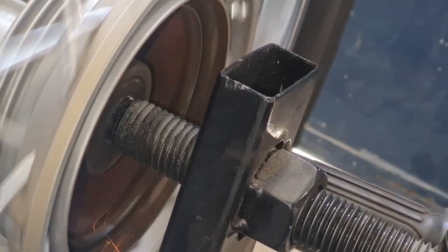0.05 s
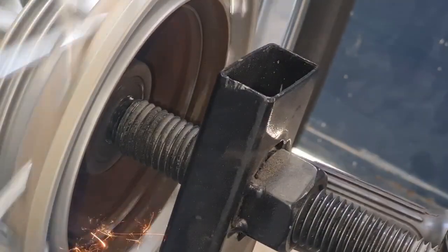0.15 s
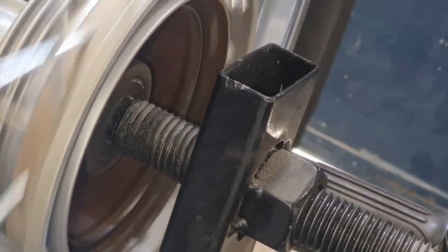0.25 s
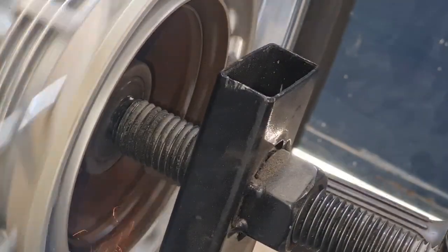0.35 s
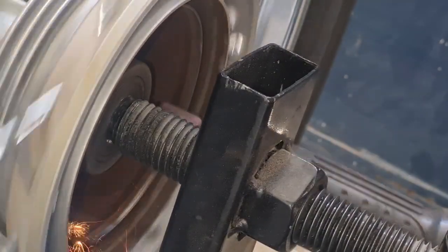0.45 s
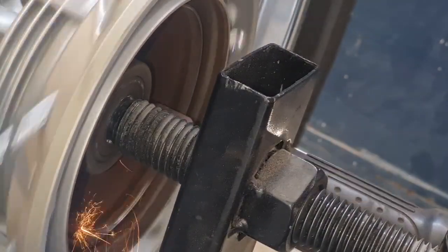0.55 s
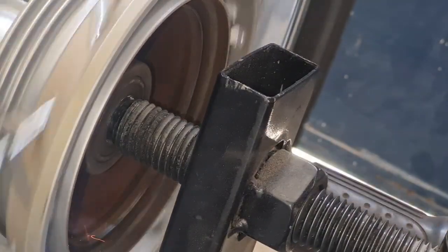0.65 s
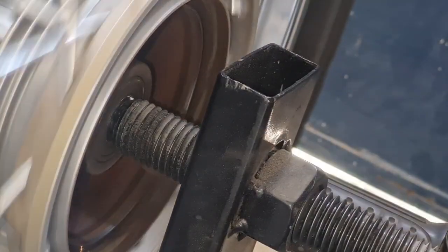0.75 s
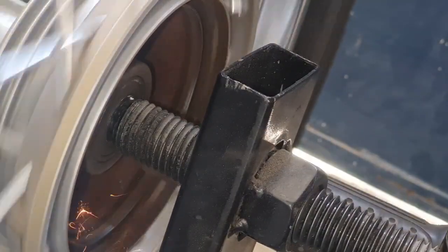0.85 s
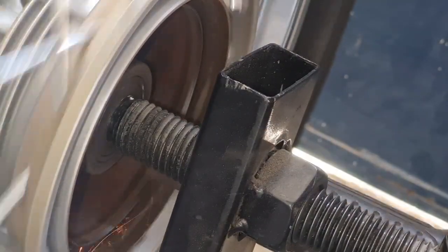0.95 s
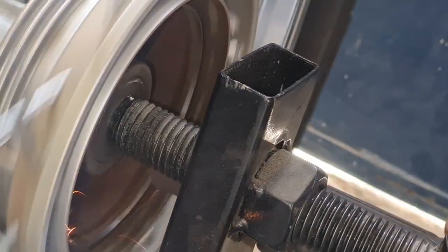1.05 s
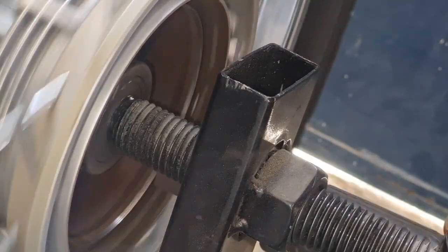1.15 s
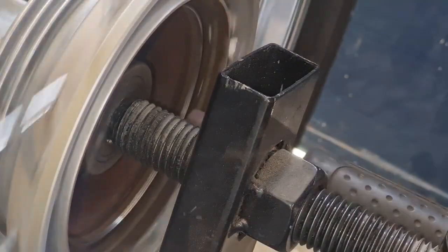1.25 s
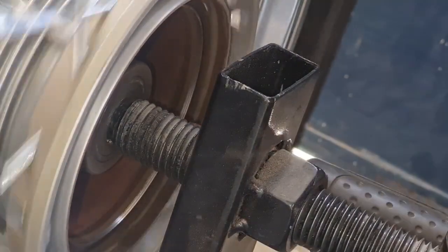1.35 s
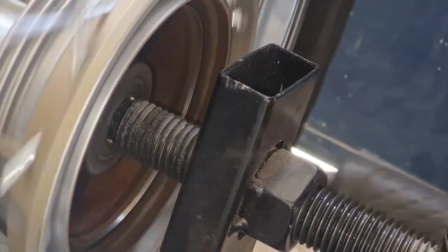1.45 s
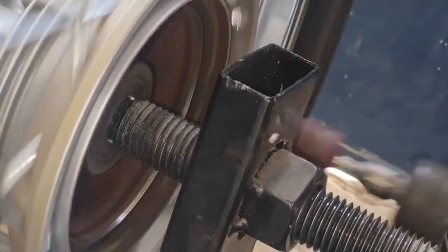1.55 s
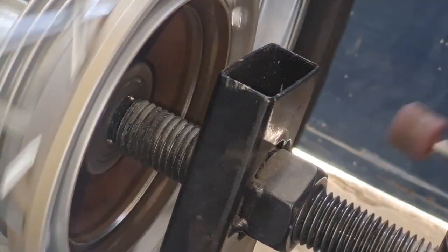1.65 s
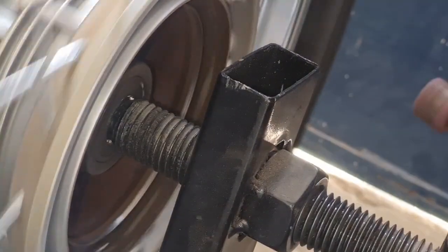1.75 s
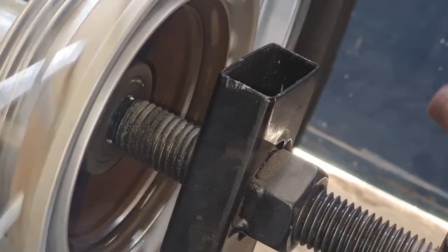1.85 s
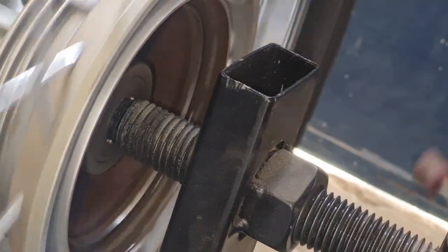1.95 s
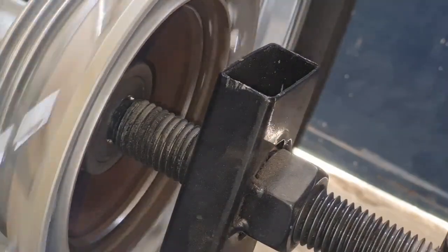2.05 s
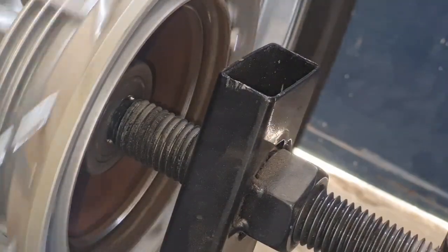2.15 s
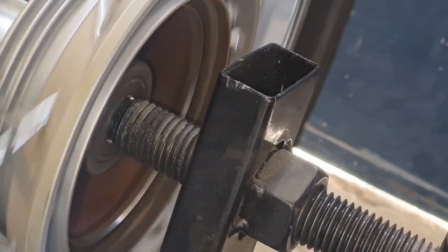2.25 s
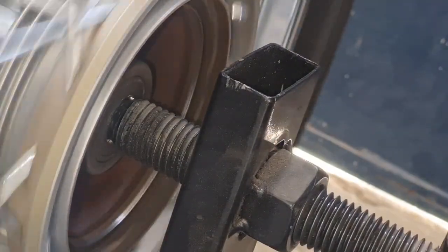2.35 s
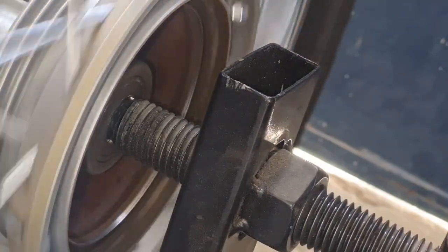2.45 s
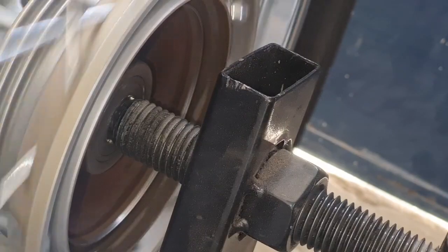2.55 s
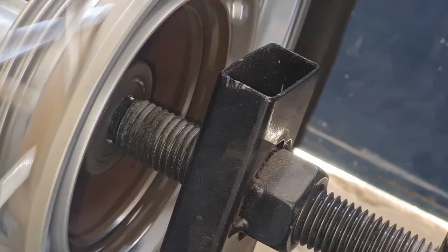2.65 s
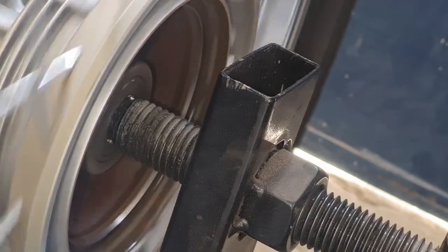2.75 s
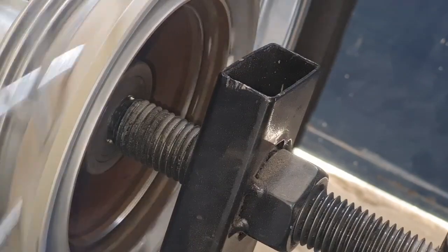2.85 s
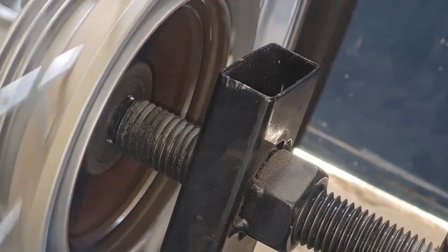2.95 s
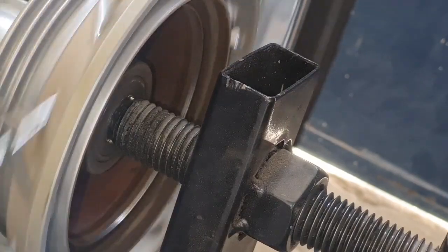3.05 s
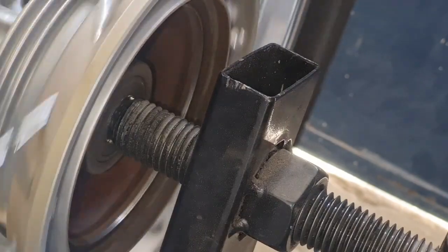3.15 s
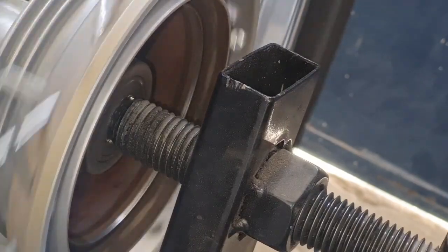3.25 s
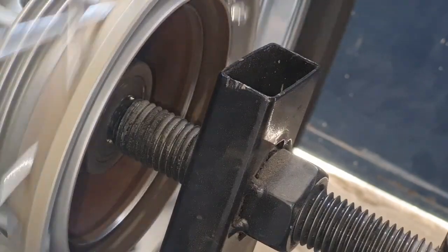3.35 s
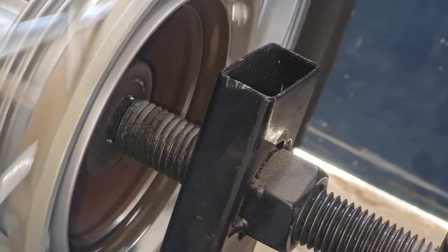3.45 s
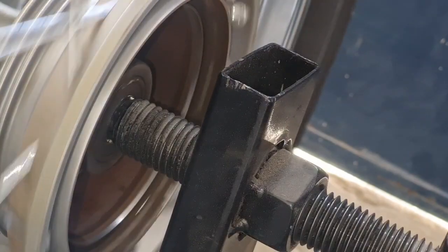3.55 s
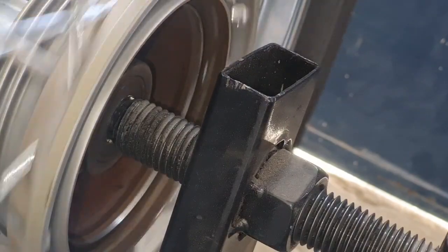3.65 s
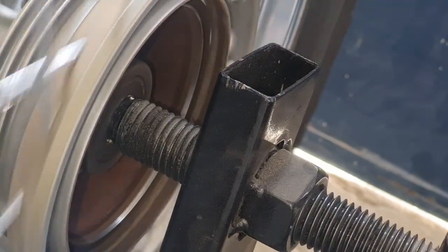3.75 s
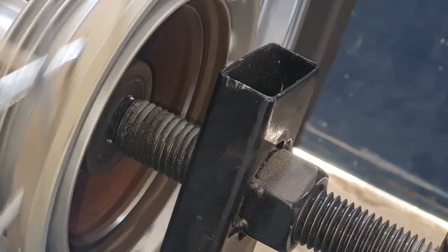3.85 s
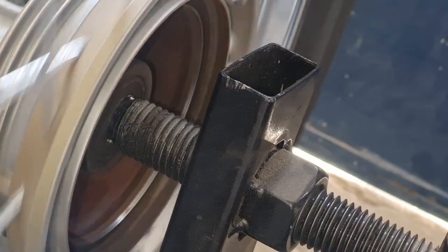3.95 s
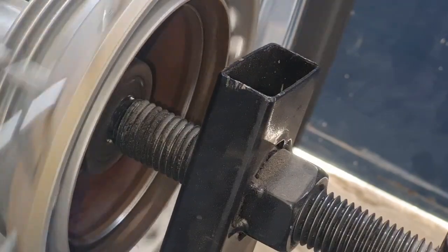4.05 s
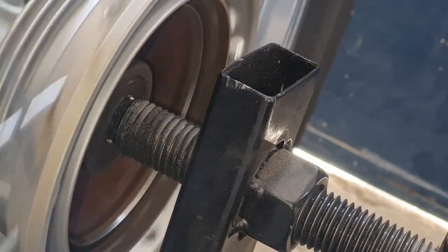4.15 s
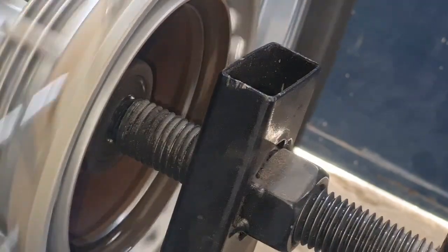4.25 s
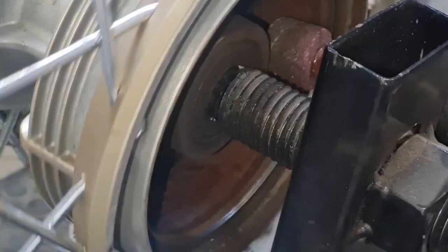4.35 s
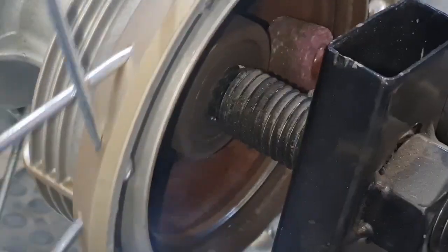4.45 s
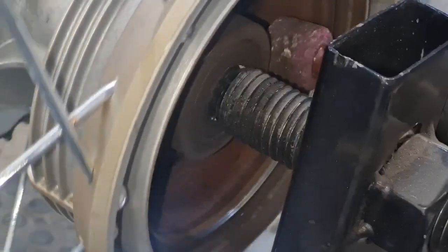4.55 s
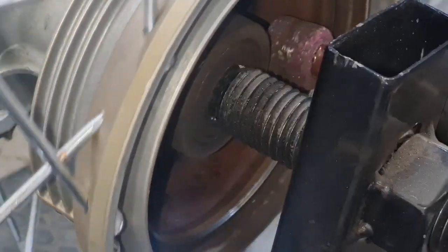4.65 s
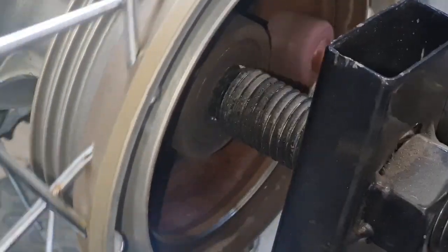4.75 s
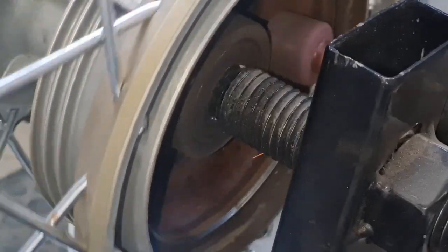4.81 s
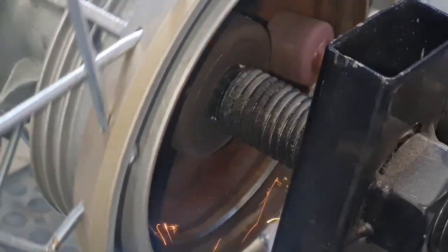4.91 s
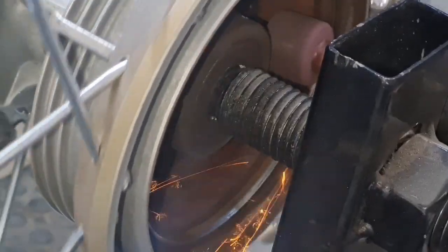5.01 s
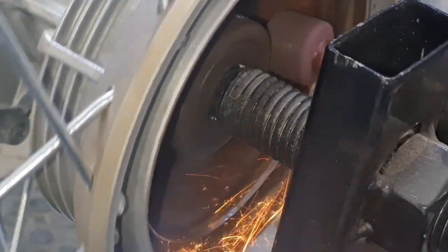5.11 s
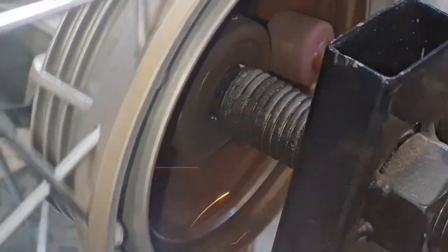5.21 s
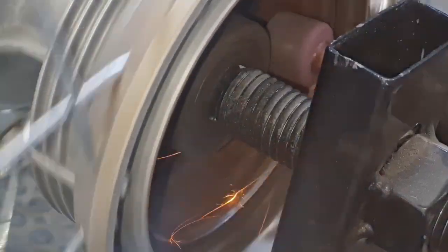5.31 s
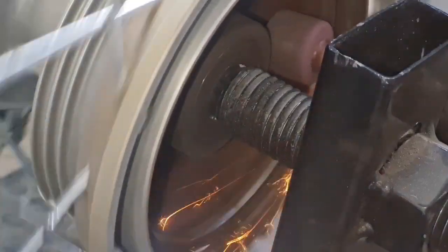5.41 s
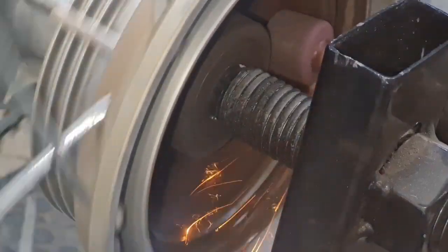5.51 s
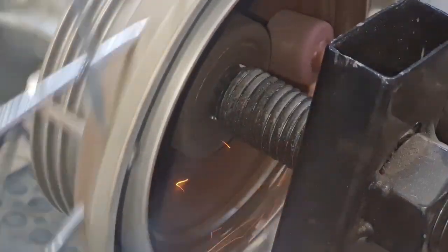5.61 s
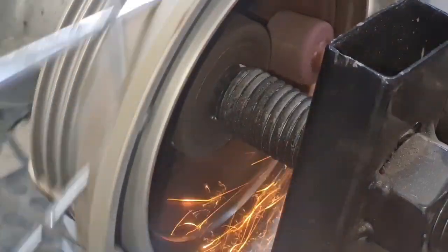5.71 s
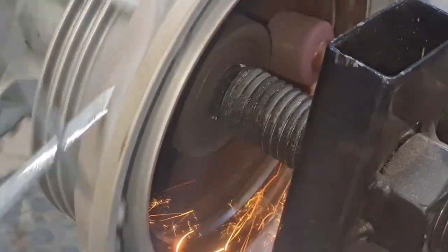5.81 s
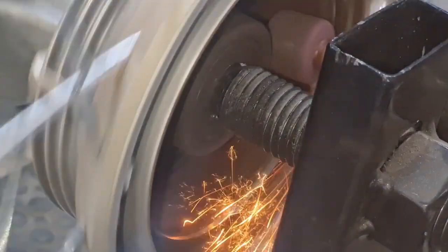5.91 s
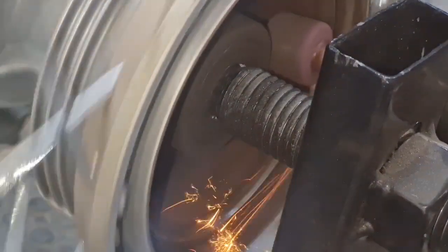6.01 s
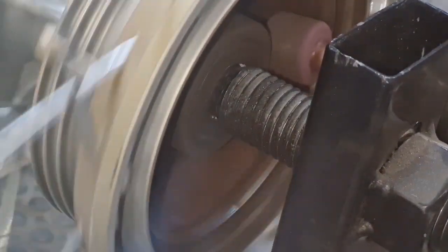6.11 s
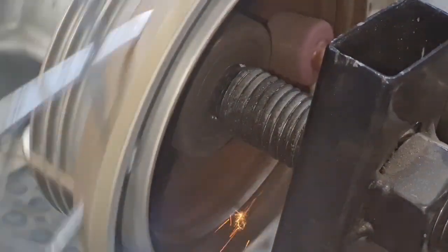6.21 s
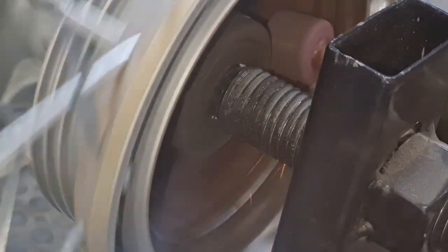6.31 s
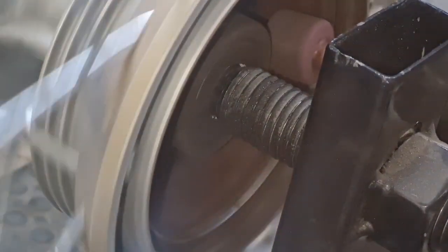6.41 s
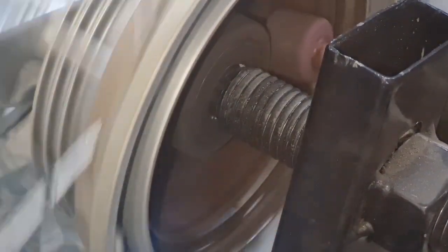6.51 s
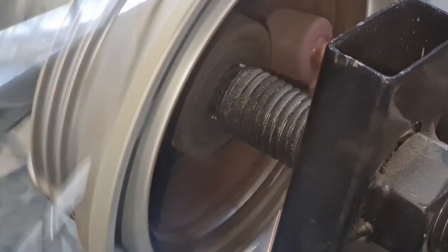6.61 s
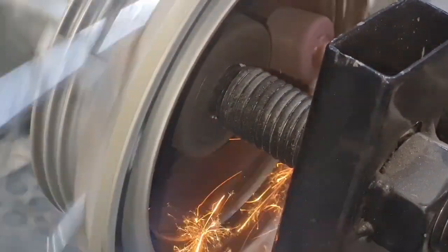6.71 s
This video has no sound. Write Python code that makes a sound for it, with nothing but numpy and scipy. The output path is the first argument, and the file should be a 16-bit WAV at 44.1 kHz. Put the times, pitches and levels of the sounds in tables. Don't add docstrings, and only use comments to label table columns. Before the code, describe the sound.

From the start a hand-held electric grinder rasps loudly inside a hollow metal drum: dense gritty hiss, a fast buzzing knock from the uneven stone and a piercing ring in the upper mids, the motor pitch climbing over the first second. Around 1.2 s the stone skips with a knock, and by 1.4 s it is off the metal. The motor then coasts, its thin whistles sliding steadily downward amid wide airy fan rush and wheel roar, with a small clack near 2.4 s. At 4.4 s this cuts to quiet, low workshop murmur with barely audible pings. At 4.8 s the stone lands with several hard knocks and grinds again, darker and heavier; the motor surges up to 5.8 s, bogs into a growl around 6.5 s, and recovers with a fresh loud bite at the end. Close stereo microphones, short metallic reflections, right side louder.

```python
import sys
import numpy as np
from scipy import signal
from scipy.fft import rfft, irfft, next_fast_len
from scipy.io import wavfile
from scipy.ndimage import uniform_filter1d

SR = 44100
rng = np.random.default_rng(int(sys.argv[2]) if len(sys.argv) > 2 else 0)


def master_out(mix):
    frames = np.transpose(np.atleast_2d(mix))
    ceiling = np.clip(frames, -1, 1)
    pcm = np.round(ceiling * 32767).astype(np.int16)
    wavfile.write(sys.argv[1], SR, pcm)


def gain_from_db(level_db):
    decades = np.asarray(level_db, float) / 20
    return 10 ** decades


N = 298557
T = np.arange(N) / SR
CUT_OUT, CUT_IN, FADE = 4.417, 4.788, .008
EDGE_HZ = 16050
RING_HZ, RING_WIDTH = 1646, 145

# t/s, grit level/dB, share of the stone's sharp edge in the cut (0-1)
CONTACT = [
    [(0.0, -24, 0.47), (0.28, -24.5, 0.5), (0.4, -22, 0.73), (0.6, -29.5, 0.6), (0.74, -28, 0.6),
     (0.82, -26, 0.75), (1.1, -27, .3), (1.2, -31.5, .6), (1.33, -40, 0)],
    [(4.795, -23, 0.3), (4.97, -21.5, 0.6), (5.03, -27, 1), (5.3, -26.5, 0.63), (5.8, -28.5, 0.79),
     (6.1, -27.5, 0.83), (6.5, -31.5, 0.26), (6.66, -30, 0.5), (6.75, -21.5, .5)],
]
# t/s, half length/s, grit level/dB, ring level/dB
BITES = [(0.13, .02, -4, -20), (0.3, 0.16, -1.5, -1), (0.555, .03, -1, 11), (0.76, .015, -1.5, 5),
         (0.81, .012, 2, -5), (1.08, .12, 3, 5.5), (1.15, .012, -4, -13), (1.19, .04, 2.5, 1.5),
         (4.87, .015, -3.5, -43), (4.99, .02, 2, -2), (5.18, .02, 3.5, 1), (5.305, .025, 2.5, 5.5),
         (5.378, .02, -3, 1), (5.44, .025, 3, 10), (5.565, .02, -1.5, 9), (5.835, .035, 1, 7.5),
         (5.918, .018, -5, 3), (5.96, .02, 0, 10.5), (6.003, .012, -5.5, 6), (6.08, 0.081, -3, 2),
         (6.155, .03, -8.5, 5), (6.2, .012, -0.5, 6), (6.32, .02, 2, -8.5), (6.415, .035, 2, 6.5),
         (6.525, .025, -0.5, 11), (6.572, .025, -5, 4), (6.63, .04, 1, -5), (6.69, .015, -7.5, -1),
         (6.755, .03, -1, 6.5)]
# t/s, nearness/dB
NEARNESS = [(1.35, 2), (1.5, 0), (2.2, -4), (2.35, 1), (2.7, 3.5), (3.3, 4), (4.41, 1.5)]
# t/s, peak level/dB, f/Hz, decay time/s
KNOCKS = [(1.163, -10, 1680, .04), (2.413, -36, 256, .04), (2.4297, -16, 1200, .012),
          (4.83, -8, 1900, .012), (4.8875, -4, 1700, .014), (4.965, -11, 1600, .015),
          (6.019, -15, 1600, .025), (6.499, -17, 1620, .02), (6.698, -16, 1650, .03)]


def evened(x):
    return x / np.sqrt(np.mean(x ** 2) + 1e-20)


def curve(*tables):
    s, *columns = np.transpose(np.vstack(tables))
    return [np.interp(T, s, c) for c in columns]


def read(points, hz):
    f, value = np.transpose(points)
    return np.interp(np.log(hz + 1), np.log(f + 1), value)


def swells(rows):
    s, half, *levels = np.transpose(rows)
    coarse_t = T[::32]
    bells = np.exp(-((coarse_t[:, None] - s) / half) ** 2)
    return [np.interp(T, coarse_t, bells @ db) for db in levels]


def colour(x, points, lo_hz=0., hi_hz=3e4):
    size = next_fast_len(N)
    hz = np.fft.rfftfreq(size, 1 / SR)
    z = rfft(x, size) * gain_from_db(read(points, hz))
    in_band = (hz >= lo_hz) & (hz < hi_hz)
    share = np.sum(abs(z[..., in_band]) ** 2) / np.sum(abs(z) ** 2)
    return evened(irfft(z, size)[..., :N]) / np.sqrt(share)


def resonate(x, hz, width):
    return signal.lfilter(*signal.iirpeak(hz, hz / width, SR), x)


def drift(hz):
    noise = rng.standard_normal(N // 32 + 2)
    coarse = signal.lfilter(*signal.butter(2, hz, fs=SR / 32), noise)
    return np.interp(T, np.arange(len(coarse)) * 32 / SR, evened(coarse))


def step(s):
    return np.clip((T - s) / FADE, 0, 1)


def shaft():
    # t/s, speed/turns per s
    first_speed = [(0.0, 277.3), (0.12, 296.5), (0.3, 310.5), (0.55, 324.5), (0.8, 334), (1.0, 336),
                   (1.28, 331.8), (1.35, 341.2)]
    second_speed = [(4.84, 246), (4.93, 187), (5.12, 247), (5.28, 268), (5.44, 277.6), (5.79, 289),
                    (6.08, 201), (6.49, 115), (6.7, 190), (6.77, 201)]
    switch_off_s, inertia_s = 1.42, .04
    brush_drag, fan_drag = 43.3, 3.9e-4
    driven = np.where(T < CUT_OUT, curve(first_speed)[0], curve(second_speed)[0])
    driven = uniform_filter1d(driven, size=round(inertia_s * SR))
    even = np.sqrt(brush_drag / fan_drag)
    coast_s = np.clip(T - switch_off_s, 0, CUT_OUT)
    coast = even * np.tan(np.arctan(first_speed[-1][1] / even) - fan_drag * even * coast_s)
    coasting = (T > switch_off_s) & (T < (CUT_OUT + CUT_IN) / 2)
    return np.where(coasting, coast, driven)


def touch():
    lift_s = 1.36
    return np.clip((lift_s - T) / 0.026, 0, 1) + (T > CUT_OUT)


def floor():
    # f/Hz, level/dB
    rumble_spectrum = [(22, -34.5), (38, -6), (56, 6), (91, -5.5), (123, 3), (177, -7), (259, -5),
                       (323, -5), (420, -13), (550, -57.5), (920, -120)]
    quiet_spectrum = [(18, -44.5), (30, -11), (59, -2.5), (215, -15), (287, -13), (394, -22.5), (740, -27),
                      (988, -26.5), (1250, -34), (1630, -33), (2350, -40), (4000, -44), (8000, -57),
                      (16000, -67)]
    # t/s, half length/s, level/dB
    gusts = [(0.3, 0.82, 9.5), (2.55, 0.47, 7.5), (3.05, 0.31, 12), (3.5, 0.25, 7), (4.1, 0.63, 13.5),
             (4.88, 0.11, 6), (5.35, 0.78, 8), (5.87, .12, -9), (6.3, 0.05, -2), (6.72, 0.23, 10.5)]
    rumble_db, quiet_db = -64.5, -49.5
    gap = step(CUT_OUT - FADE) - step(CUT_IN)
    a, b = rng.standard_normal((2, 2, N))
    rumble = colour(a[0] + 0.3 * a[::-1], rumble_spectrum, 30, 220)
    rumble = rumble * gain_from_db(rumble_db + swells(gusts)[0] + 2.0 * drift(8)) * (1 - gap)
    quiet = colour(b[0] + 1.1 * b[::-1], quiet_spectrum) * gain_from_db(quiet_db + 2.0 * drift(71))
    return rumble + gap * quiet


def air(speed):
    # f/Hz, level/dB
    rush_spectrum = [(120, -19.5), (200, -16.5), (448, -12.5), (722, -6), (1230, -11), (1980, -1.5),
                     (2330, -5.5), (2700, -2.5), (5230, -9.5), (7270, -8), (9930, -19), (11900, -13.5),
                     (16000, -21)]
    # f/Hz, left-right likeness (0-1)
    likeness = [(100, 0.6), (600, 0.88), (2000, 0.54), (6000, 0), (16000, 0)]
    free_db, first_pass_db, heavy_pass_db = -40.5, -37.5, -65.5
    octaves = np.log2(speed / 280)
    lifted = 1 - touch()
    rush_db = free_db + 9 * octaves + curve(NEARNESS)[0]
    rush_db = lifted * rush_db + (1 - lifted) * np.where(T < CUT_OUT, first_pass_db, heavy_pass_db)
    roar_db = lifted * (4.0 - 6 * octaves)
    size = next_fast_len(N)
    same = np.clip(read(likeness, np.fft.rfftfreq(size, 1 / SR)), 0, 1)
    right, other = rfft(rng.standard_normal((2, size)))
    left = np.roll(irfft(same * right + np.sqrt(1 - same ** 2) * other, size), 7)
    both = np.array([left, irfft(right, size)])
    rush = colour(both, rush_spectrum, 1700, 15800) * gain_from_db(0.95 * drift(11.8))
    roar = signal.sosfiltfilt(signal.butter(2, [450, 1400], "band", fs=SR, output="sos"), rush)
    hiss = signal.sosfiltfilt(signal.butter(2, 7500, "high", fs=SR, output="sos"), rush)
    dulled = hiss * (np.minimum(speed / 240, 1.2) ** 0.48 - 1)
    return gain_from_db(rush_db - 0.3) * (rush + dulled - roar + evened(roar) * gain_from_db(roar_db - 7.0))


def motor(turns, speed):
    hum_idle_db = (-56.5, -74)
    hum_loaded_db = (-45, -43.5)
    whistle_orders = 24, 31, 48, 60, 72, 84, 96
    # level/dB, slope/dB per octave of speed, change under load/dB
    whistle = [(-56.5, -1.5, 8.5), (-54, 18.5, 7), (-51.5, 13.5, -16.5), (-68, 9, -18), (-44, 25, -8),
               (-67, 4.5, -17), (-54, 2.5, -14.5)]
    # f/Hz, width/Hz, level/dB
    vents = [(3800, 450, 12), (4874, 89, 11.5), (7230, 470, 8.5), (10840, 250, 4.5), (12200, 610, 8.5)]
    housing_hz, housing_width, slot_peak_db = 7250, 420, -50.5
    load = np.clip((1.28 - T) / .05, 0, 1) + (T > CUT_OUT)
    octaves = np.log2(speed / 280)
    near_db = curve(NEARNESS)[0] * (1 - load)
    pushed_db = 0.99 * (curve(*CONTACT)[0] + swells(BITES)[0] + 28)
    out = 0
    for order, idle_db, loaded_db in zip((1, 2), hum_idle_db, hum_loaded_db):
        under_load_db = loaded_db + pushed_db + 3.5 * octaves
        free_db = idle_db + 9 * octaves
        db = load * under_load_db + (1 - load) * free_db + 1.06 * drift(2.7)
        out = out + gain_from_db(db) * np.sin(2 * np.pi * order * turns)
    out = out * gain_from_db(4 * drift(30) - 4)
    slot_db = slot_peak_db - 20 * np.log10(1 + ((36 * speed - housing_hz) / housing_width) ** 2)
    parts = [(36, slot_db)]
    for order, (db, slope_db, load_db) in zip(whistle_orders, whistle):
        vents_db = sum(peak_db / (1 + ((order * speed - hz) / width) ** 2) for hz, width, peak_db in vents)
        parts.append((order, db + slope_db * octaves + load_db * load + vents_db + near_db))
    for order, db in parts:
        depth = min(order / 70, .75) * (order % 12 == 0)
        uneven = 1 + depth * np.cos(2 * np.pi * (turns + rng.random()))
        heard = order * speed < EDGE_HZ
        tone = np.sin(2 * np.pi * order * turns + order / 110 * drift(120))
        out = out + heard * gain_from_db(db + 2.5 * drift(30)) * uneven * tone
    return out


def chatter():
    # start/s, end/s, f/Hz, width/Hz, level/dB
    rattles = [(1.07, 1.28, 650, 70, -39), (1.27, 1.45, 4200, 250, -45), (1.95, 2.2, 1980, 200, -48),
               (2.35, 2.75, 2750, 150, -51), (4.79, 5.12, 350, 50, -46)]
    noise, out = rng.standard_normal(N), np.zeros(N)
    for start, end, hz, width, db in rattles:
        shake = evened(resonate(resonate(noise, hz, width), hz, 2 * width))
        out = out + gain_from_db(db) * shake * np.sin(np.pi * np.clip((T - start) / (end - start), 0, 1)) ** .5
    return out


def knocks():
    # t/s, peak level/dB
    pings = [(4.4662, -52), (4.545, -54), (4.605, -58), (4.7451, -65.5)]
    out, t = np.zeros(N + SR), np.arange(SR // 4) / SR
    rows = list(KNOCKS) + [(s, db, RING_HZ, .05) for s, db in pings]
    for s, db, hz, t60 in rows:
        click = uniform_filter1d(rng.standard_normal(len(t)), size=5) * np.exp(-t / .002)
        body = np.sin(2 * np.pi * hz * t) + 1.1 * (db > -40) * click
        decay = gain_from_db(db - 60 * t / max(t60, .004))
        out[round(s * SR):][:len(t)] += decay * body * np.minimum(t / .0005, 1)
    return out[:N]


def grinding(turns, speed):
    # order of the turn, level/dB
    stone = [(1, -14.5), (2, 9.5), (3, 0), (4, 0), (5, -2), (6, -1), (7, -1), (8, 0.5), (9, -0.5),
             (10, -4.5), (11, -7.5), (12, 0), (13, -8), (16, -2), (30, -4.5), (47, 2)]
    # f/Hz, width/Hz, level over the grit/dB
    drum_modes = [(1820, 13, -4), (2322, 34, 0), (3830, 360, -18.5), (4764, 175, 0.5), (6270, 250, -3),
                  (7130, 300, -1), (9070, 60, 9.5), (10570, 70, -2), (13240, 310, 7.5), (15500, 320, 5.5)]
    # f/Hz, level/dB
    grit_spectra = [
        [(150, -39.5), (250, -15), (319, -26), (386, -13), (651, -23.5), (1450, -2), (1640, 5.5), (2490, -2),
         (2960, 0), (7570, -15.5), (9830, -29), (13200, -24.5), (16000, -29.5)],
        [(150, -70), (250, -30.5), (662, -33.5), (1100, -19.5), (1350, -17), (1640, -2.5), (2130, -16.5),
         (3400, -14), (5630, -26), (7840, -30.5), (10000, -45.5), (13200, -41.5), (16000, -44.5)],
    ]
    ring_re_grit_db = -4, 0
    most_regular = 0.77
    growl_hz, growl_width, growl_db = 960, 670, 1.5
    bounces_per_s, bounce_s, bounce_depth, settle_s = 82, .003, 1.8, .25
    grit_db, edge = curve(*CONTACT)
    bite_db, surge_db = swells(BITES)
    grit_db = grit_db + bite_db
    fine_db = -14 + 12.5 * edge + np.log2(speed / 280)
    ring_db = grit_db + surge_db + np.where(T < CUT_OUT, *ring_re_grit_db)
    regular = np.clip(most_regular * np.minimum(speed / 290, 1) ** 1.16, 0, 1)

    orders, angle = np.arange(1, 48)[:, None], np.linspace(0, 1, 2049)
    lumps = .5 * rng.random((47, 1))
    rim = gain_from_db(np.interp(orders, *np.transpose(stone))) * np.cos(2 * np.pi * (orders * angle + lumps))
    knock = evened(np.interp(turns % 1, angle, rim.sum(axis=0))) * gain_from_db(2.2 * drift(6.5))
    puff = .5 + np.exp(-(turns % 1) / 0.13)
    scratch = puff * rng.standard_normal(N) * gain_from_db(2.0 * drift(100))
    drive = 0.84 * regular * knock + np.sqrt(1 - regular ** 2 * 0.62) * evened(scratch)
    drive = drive + sum(gain_from_db(db) * resonate(drive, hz, w) for hz, w, db in drum_modes)
    drive = np.where(T < CUT_OUT, *(colour(drive, grit, 1833, 6600) for grit in grit_spectra))

    ring = resonate(resonate(drive, RING_HZ, RING_WIDTH), RING_HZ, 3 * RING_WIDTH)
    ring = ring / uniform_filter1d(ring ** 2, size=800) ** 0.21
    low = signal.sosfiltfilt(signal.butter(4, 8000, fs=SR, output="sos"), drive)
    fine = evened(drive - low) * gain_from_db(fine_db)
    low = low - resonate(low, RING_HZ, 300)
    low = low + (1 - regular / most_regular) * gain_from_db(growl_db) * resonate(low, growl_hz, growl_width)

    since_hop = (bounces_per_s * (T - KNOCKS[3][0]) % 1) / bounces_per_s
    settling = np.exp(-((T - CUT_IN) / settle_s) ** 2 - since_hop / bounce_s)
    hops = 1 + bounce_depth * (T > CUT_OUT) * settling
    hops = hops / np.sqrt(uniform_filter1d(hops ** 2, size=2000))
    grit = gain_from_db(grit_db + 0.7) * (low * hops + fine * hops)
    present = touch() * (1 - step(CUT_OUT - .1) + step(CUT_IN - .1))
    return present * (grit + gain_from_db(ring_db) * evened(ring))


def workshop(x, late, near_db):
    # f/Hz, level/dB
    echo = [(100, -2.5), (600, -4), (1300, 11), (1650, -6), (2100, 4.5), (3000, 1.5), (16000, 9.5)]
    hop = 4096
    t, hz = np.arange(hop) / SR, np.fft.rfftfreq(hop, 1 / SR)
    wet = gain_from_db(read(echo, hz) - near_db)
    total = np.sqrt(1 + wet ** 2)
    direct = np.exp(-2j * np.pi * hz * np.array([[64 + late], [64]]) / SR)
    out = np.zeros((2, N + 5 * hop))
    out[:, hop:N + 2 * hop - 1] = signal.oaconvolve(x[None], irfft(direct / total), axes=1)
    padded = np.pad(x, (hop, 2 * hop))
    facing = np.sin(np.pi * np.arange(2 * hop) / (2 * hop))
    for at in range(0, N + hop, hop):
        tail = rng.standard_normal((2, hop)) * gain_from_db(-60 * t / 0.038) * (t > .002)
        tail = irfft(rfft(tail) / np.linalg.norm(tail[0]) * wet / total)
        piece = padded[at:at + 2 * hop] * facing
        out[:, at:at + 3 * hop - 1] += signal.fftconvolve(piece[None], tail, axes=1)
    return out[:, hop + 64:N + hop + 64]


def scene():
    speed = shaft()
    turns = np.cumsum(speed * (1 + .0007 * drift(20))) / SR
    running = 1 - step(CUT_OUT - FADE) + step(CUT_IN)
    drum = workshop(grinding(turns, speed) + chatter(), late=-1, near_db=0) * running
    blows = workshop(knocks(), late=-1, near_db=8) * gain_from_db(-3.5)
    tool = (workshop(motor(turns, speed), late=7, near_db=9) + air(speed)) * running
    return gain_from_db(0.91) * (drum + blows + tool) + floor()


def roll_off(x):
    return signal.sosfilt(signal.butter(12, 16380, fs=SR, output="sos"), x)


def record(dry):
    # f/Hz, level/dB
    lean_db = [(60, -3), (110, 0.5), (200, -2), (380, -4.5), (700, -3.5), (1350, -3.5), (1650, -5),
               (2050, -4), (2600, -2), (4400, -3.5), (8120, -6.5), (15000, -3)]
    size = next_fast_len(N)
    hz = np.fft.rfftfreq(size, 1 / SR)
    lean = gain_from_db(read(lean_db, hz) * np.array([[.5], [-.5]])) * (hz < EDGE_HZ)
    mix = irfft(rfft(dry, size) * lean, size)[:, :N]
    return roll_off(mix)


dry = scene()
out = record(dry)
master_out(out)
```